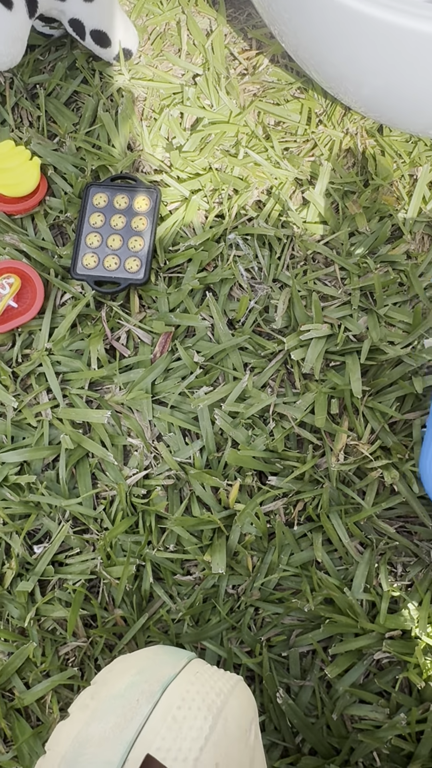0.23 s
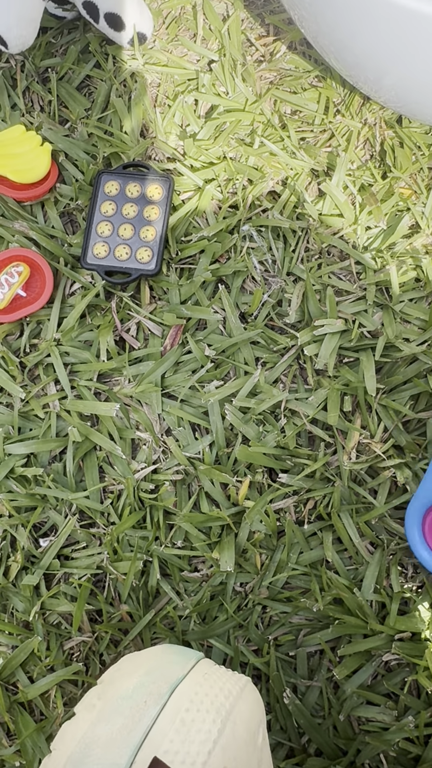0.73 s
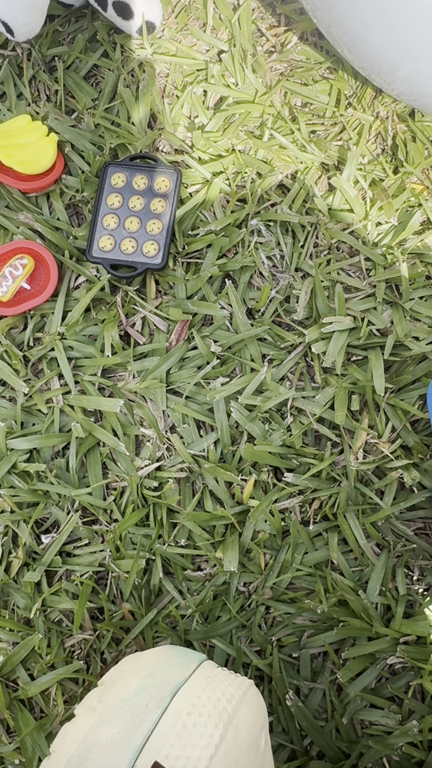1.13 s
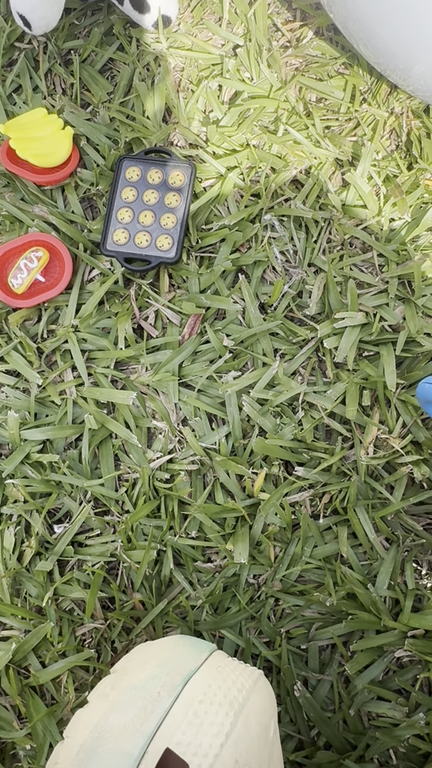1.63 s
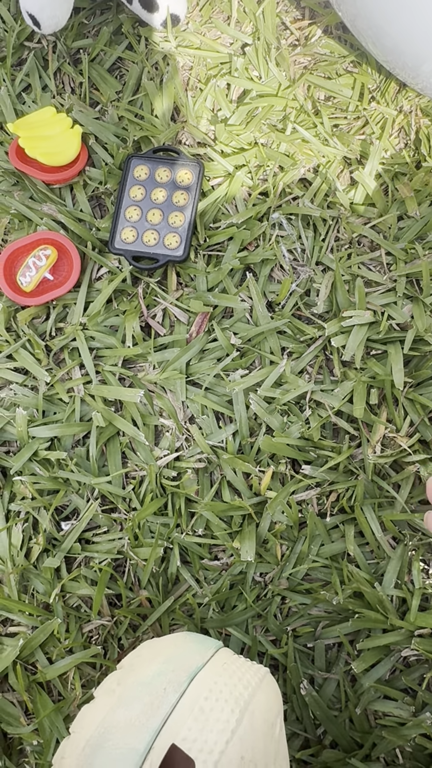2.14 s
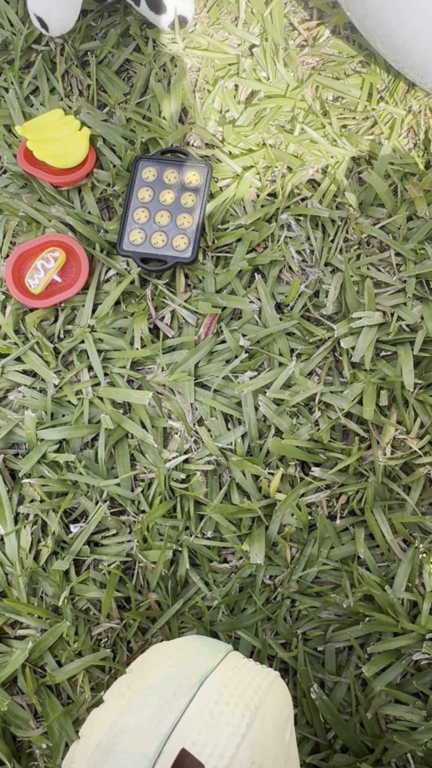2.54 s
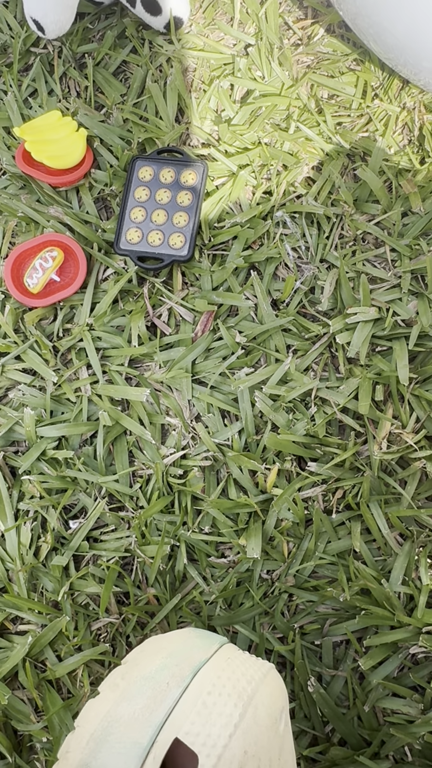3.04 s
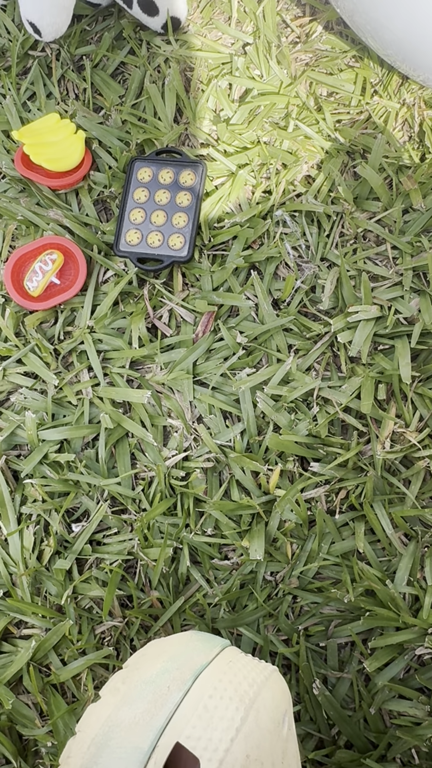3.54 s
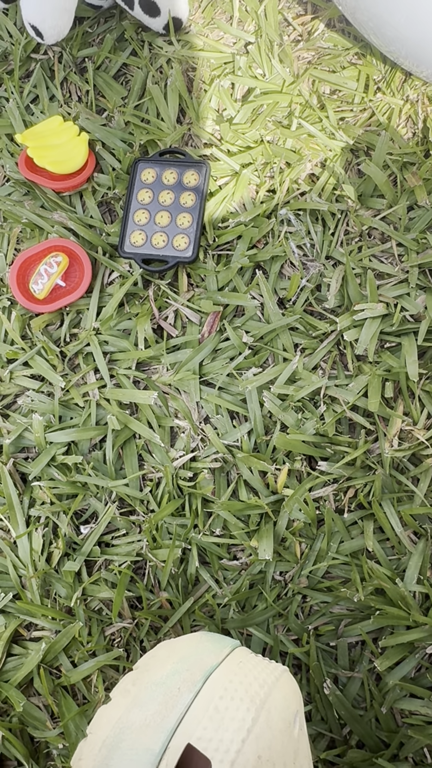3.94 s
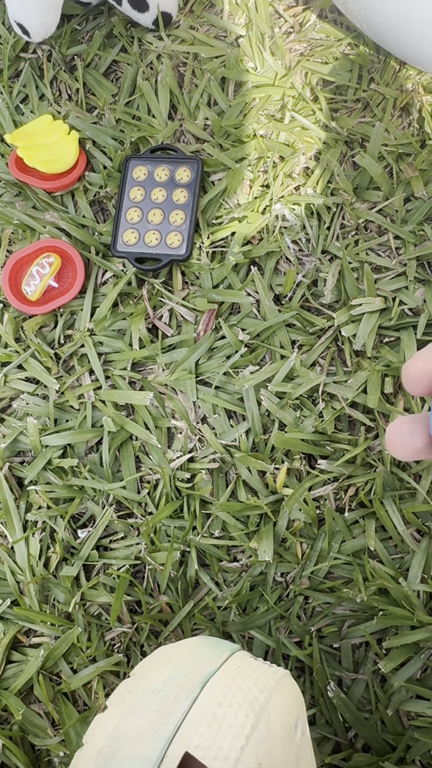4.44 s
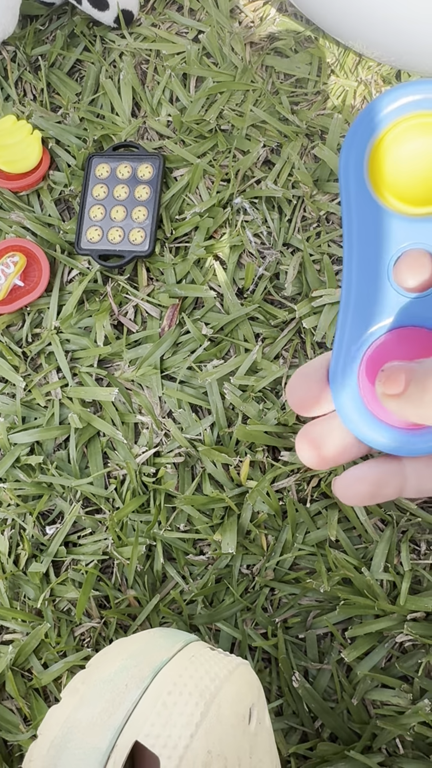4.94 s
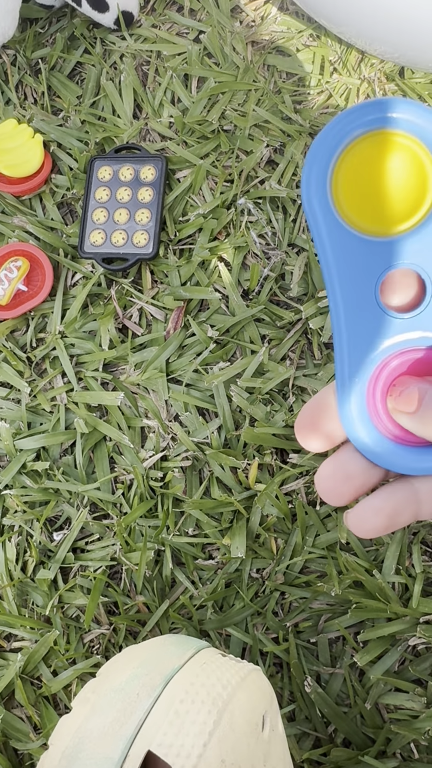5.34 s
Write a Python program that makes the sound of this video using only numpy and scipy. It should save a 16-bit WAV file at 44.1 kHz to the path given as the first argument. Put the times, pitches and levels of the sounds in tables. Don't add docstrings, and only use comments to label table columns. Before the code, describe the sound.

Quiet outdoor setting with steady low hum, airy hiss and faint cars. A far bird chirps a rising note and falling answer about twice a second. Close up, fingers tick and brush plastic, then two domes are popped in and later popped back out, dry and very brief, the outward ones brighter and clickier. Close stereo microphone, hardly any echo on the toy.

```python
import sys
import numpy as np
from scipy import signal
from scipy.fft import rfft, irfft, next_fast_len
from scipy.io import wavfile
from scipy.ndimage import uniform_filter1d

SR = 44100
rng = np.random.default_rng(int(sys.argv[2]) if len(sys.argv) > 2 else 0)


def invert_db(x):
    u = np.asarray(x, float) / 20
    return 10 ** u


def transcribe(signal):
    frames = np.atleast_2d(signal).T
    limited = np.clip(frames, -1, 1)
    pcm = np.round(limited * 32767).astype(np.int16)
    wavfile.write(sys.argv[1], SR, pcm)


N = 246445
T = np.arange(N) / SR
SIZE = next_fast_len(N)
BINS_HZ = np.arange(SIZE // 2 + 1) * SR / SIZE + 1e-9
OCTAVES = np.log2(BINS_HZ)


def walk(rate_hz):
    knots = np.repeat(rng.standard_normal(int(N / SR * rate_hz) + 2), 8)
    smooth = uniform_filter1d(uniform_filter1d(knots, 8), 8)
    return 1.3 * np.interp(T * rate_hz * 8, np.arange(len(knots)), smooth)


def over_hz(table, column=1):
    rows = np.array(table, float)
    return np.interp(OCTAVES, np.log2(rows[:, 0]), rows[:, column])


def hiss(colour, flicker_db, rate_hz, source=None):
    low_hz, high_hz = colour[0][0], colour[-1][0]
    if source is None:
        source = rng.standard_normal(N)
    spectrum = rfft(source, SIZE) * invert_db(over_hz(colour))
    spectrum[(BINS_HZ < low_hz) | (BINS_HZ > high_hz)] = 0
    out = np.zeros(N)
    for octave in range(int(np.log2(low_hz)), int(np.log2(high_hz)) + 2):
        share = np.clip(1 - np.abs(OCTAVES - octave), 0, 1)
        flicker = invert_db(flicker_db * walk(rate_hz))
        out += irfft(spectrum * share, SIZE)[:N] * flicker
    return out / np.sqrt(np.mean(out ** 2))


def ports(x):
    # frequency in Hz, left minus right in dB, left lead in radians.
    port_split = [(300, 0, -.4), (550, -1, -.4), (750, -6, 0), (1100, -4, .4), (2400, 0, .2), (3300, 2, .6),
                  (4300, 4, .1), (5500, 0, -.5), (7000, 0, -1.25), (10000, 0, -2.55), (14500, 0, -4.1),
                  (17000, 0, -5)]
    half = invert_db(over_hz(port_split) / 2) * np.exp(.5j * over_hz(port_split, column=2))
    bass_cut = np.clip((BINS_HZ - 200) / 150, 0, 1)
    top_cut = np.clip((17000 - BINS_HZ) / 900, 0, 1)
    spectrum = rfft(x, SIZE) * bass_cut * top_cut
    return np.array([irfft(spectrum * half, SIZE)[:N], irfft(spectrum / half, SIZE)[:N]])


def cooler():
    # frequency in Hz, level in dB rms, start phase in turns.
    hum = [
        (58.9, -48.5, .1),
        (117.9, -54.5, .0),
        (119.95, -55.5, .22),
        (176.6, -61.5, .3),
        (240.1, -56.5, .4),
    ]
    # frequency in Hz, density in dB per Hz.
    rumble_colour = [(20, -47.5), (35, -21), (50, -6.5), (62, -1.5), (80, -6.5), (100, -1), (150, -8.5),
                     (210, -13.5), (300, -18), (400, -28), (600, -49)]
    # time in seconds, rumble level in dB.
    load = [(0, -55.5), (.4, -53), (.8, -55.5), (2.0, -55), (3.55, -56), (3.87, -52.5), (4.28, -52.5),
            (4.7, -55), (5.59, -53.5)]
    # time in seconds, frequency in Hz, length in seconds, level in dB.
    engine = (.87, 99, .16, -44)
    lines = np.zeros(N)
    for hz, db, turns in hum:
        lines += invert_db(db + 0.98 * walk(5)) * np.sqrt(2) * np.sin(2 * np.pi * (hz * T + turns))
    at_s, hz, length_s, db = engine
    thump = invert_db(db) * np.exp(-(2 * (T - at_s) / length_s) ** 2) * np.sin(2 * np.pi * hz * T)
    rumble_db = np.interp(T, *np.transpose(load)) + 5.5
    return lines + thump + hiss(rumble_colour, 0.99, 3.7) * invert_db(rumble_db)


def outdoors():
    # frequency in Hz, density in dB per Hz.
    mid_colour = [(300, -16.5), (400, -1), (600, -6.5), (850, -15.5), (1450, -11), (2100, -16.5),
                  (2800, -13.5), (3800, -14), (4700, -18.5), (6500, -45)]
    side_colour = [(30, -8.5), (65, -3), (150, -5.5), (240, 0.5), (520, -5.5), (740, -2), (940, -11.5),
                   (1280, -11), (1800, -22.5), (2450, -13), (3200, -15), (5000, -19.5), (6500, -44)]
    air_colour = [(3500, -25.5), (5000, -9.5), (6300, 0.5), (7000, -5), (8500, -6), (11500, -2),
                  (14500, -18), (16000, -21), (16500, -50.5)]
    # time in seconds, half length in seconds, swell in dB.
    cars = [
        (0.754, 0.34, 3.5),
        (1.978, 0.47, 0.5),
        (2.602, 0.59, 2.5),
        (3.81, 0.466, 3.5),
        (5.398, 0.58, 2.5),
    ]
    # frequency in Hz, width in Hz, level in dB.
    tyres = (2150, 500, -78)
    near = [np.exp(-((T - s) / half_s) ** 2) for s, half_s, _ in cars]
    traffic_db = -76 + sum(share * swell_db for share, (_, _, swell_db) in zip(near, cars))
    mid = hiss(mid_colour, 1.07, 6) * invert_db(traffic_db + 5.5)
    side = hiss(side_colour, 1.2, 6) * invert_db(traffic_db + 7.0)
    air = ports(hiss(air_colour, 1.6, 8) * invert_db(-69.5))
    hz, width_hz, whine_db = tyres
    whine_colour = [(hz - width_hz, -15), (hz, 0), (hz + width_hz, -15)]
    whine = hiss(whine_colour, 1.5, 8) * invert_db(whine_db) * near[0]
    return np.array([mid + side, mid - side]) + air + whine


def bird():
    # start in seconds, note level in dB, answer level in dB, answer start in Hz.
    phrases = [(.18, -65.5, -72, 3500), (.738, -66, -66.5, 3520), (1.247, -64, -67, 3520),
               (1.787, -66.5, -70, 3500), (2.262, -64.5, -70.5, 3570), (2.76, -65, -69.5, 3500),
               (3.26, -65, -67, 3505), (3.69, -64.5, -66, 3850), (3.977, -65.5, -69.5, 3850),
               (4.22, -65.5, -69.5, 3900), (4.45, -66.5, -68, 3860), (4.647, -66.5, -69.5, 3850),
               (4.9, -66, -70, 3850), (5.33, -68, -72, 3850), (5.54, -67, -80, 3860)]
    # start in seconds, start in Hz, end in Hz, level in dB.
    lone_notes = [
        (.13, 3800, 3700, -70.5),
        (3.518, 3920, 4050, -70),
        (5.088, 3620, 3450, -65.5),
    ]
    note_s, rise_from_hz, rise_to_hz = .05, 3700, 3965
    answer_after_s, answer_fall_hz = .105, 231
    buzz_hz, buzz_rad, rasp_rad = 300, 1.3, 0.69
    tail_t60_s, direct_db = 0.43, 27

    notes = [(s, rise_from_hz, rise_to_hz, db) for s, db, _, _ in phrases] + list(lone_notes)
    notes += [(s + answer_after_s, hz, hz - answer_fall_hz, db) for s, _, db, hz in phrases]
    song = np.zeros(N + SR)
    rough = rasp_rad * walk(400)
    t = np.arange(int(note_s * SR)) / SR
    buzz = buzz_rad * np.sin(2 * np.pi * buzz_hz * t)
    swell = np.sin(np.pi * np.sqrt(t / note_s))
    for s, start_hz, end_hz, db in notes:
        turns = start_hz * t + (end_hz - start_hz) * t ** 2 / (2 * note_s)
        rasp = rough[int(s * SR / 2):][:len(t)]
        song[int(s * SR):][:len(t)] += invert_db(db) * np.sin(2 * np.pi * turns + buzz + rasp) * swell

    t = np.arange(SR // 2) / SR
    echoes = rng.standard_normal((2, len(t))) * invert_db(-60 * t / tail_t60_s)
    echoes[:, 0] = invert_db(direct_db)
    echoes /= np.sqrt(np.sum(echoes ** 2, axis=1, keepdims=True))
    return invert_db(6.0) * signal.fftconvolve(song[None], echoes, axes=1)[:, :N]


def rustle():
    # frequency in Hz, density in dB per Hz.
    rustle_colour = [(2000, -15.5), (5000, -7), (8000, -5), (11500, 0), (15000, 0.5), (15900, -8),
                     (16500, -41)]
    # start in seconds, hold in seconds, level in dB.
    strokes = [(.316, .005, -76.5), (.532, .005, -79.5), (.79, .19, -77), (1.176, .25, -78),
               (1.426, .003, -73), (1.565, .04, -84), (1.616, .005, -79), (1.864, .005, -70),
               (2.244, .005, -75), (2.65, .005, -90), (2.756, .005, -77.5), (3.106, .002, -78),
               (3.19, .11, -84.5), (3.338, .005, -79), (3.486, .005, -85), (3.618, .003, -91),
               (3.712, .005, -82), (3.788, .01, -72.5), (3.9, .05, -81), (3.992, .005, -78.5),
               (4.156, .01, -80), (4.408, .005, -82.5), (5.19, .01, -88.5)]
    grip_db_s, slip_off_db_s, resting_db = 599, 258, -103
    grain_db = 2.5 * np.repeat(rng.exponential(size=N // 40 + 1), 40)[:N]
    grains = rng.standard_normal(N) * invert_db(grain_db)
    pressure_db = np.full(N, float(resting_db))
    for s, held_s, db in strokes:
        grip_db = grip_db_s * np.maximum(s - T, 0)
        slip_db = slip_off_db_s * np.maximum(T - s - held_s, 0)
        pressure_db = np.maximum(pressure_db, db - grip_db - slip_db)
    return hiss(rustle_colour, 1.2, 16, grains) * invert_db(pressure_db + 11.0)


def add_mode(out, at_s, hz, creep_ms, t60_ms, db, way=1):
    start = int((at_s - .006) * SR)
    t = T[start:start + 1600] - at_s
    swell = np.exp(np.minimum(t, 0) / (creep_ms / 1000 + 1e-5))
    ring = invert_db(-60 * (np.maximum(t, 0) / (t60_ms / 1000 + 1e-5)) ** 1.4)
    out[start:start + len(t)] += way * invert_db(db) * swell * ring * np.cos(2 * np.pi * hz * t)


def ticks():
    # time in seconds, peak in dB, thud relative to tick in dB, thud pitch ratio.
    taps = [(0.5294, -61, -11, 0.92), (0.7887, -60, -11, 0.92), (0.9283, -65, -12, 1),
            (0.9612, -59, -10, 1), (1.0094, -60, -11, 1), (1.285, -60, -17, 1), (1.361, -58, -14, 1),
            (1.4252, -59, -19, 1), (1.6167, -63, 2, .9), (2.712, -67, 11, .8), (2.7566, -55, 6, 0.75),
            (3.105, -57, -15, 0.8), (3.3363, -57, -15, 1.1), (3.3757, -58.5, -11, 1),
            (3.618, -64.5, 12, 1.08), (3.7802, -58, -14, 1), (3.8262, -65.5, 8, 1.26),
            (3.9674, -57, -13, 0.78), (4.155, -67, -9, 1), (4.17, -57.5, -10, 1.15)]
    # frequency in Hz, T60 in ms, level in dB.
    tick_modes = [(5660, 3, -3.5), (7300, 3.8, -5), (10570, 2.6, 4), (14750, 1.8, -2.5)]
    thud_modes = [(960, 6, 0.5), (2600, 4.5, -9)]
    out = np.zeros(N)
    detune = 1 + 0.053 * rng.standard_normal((len(taps), 6))
    for (s, db, thud_db, pitch), shift in zip(taps, detune):
        for k, (hz, t60_ms, mode_db) in enumerate(tick_modes):
            add_mode(out, s + .0005, hz * shift[k], .2, t60_ms, db + mode_db + 5.0)
        for k, (hz, t60_ms, mode_db) in enumerate(thud_modes):
            thud_hz = hz * pitch * shift[-1 - k]
            add_mode(out, s + 0.00063, thud_hz, .4, t60_ms, db + thud_db + mode_db + 0.66)
    return out


def snaps():
    # time in seconds, dome lag in ms, shell creep in ms, dome creep in ms.
    pops = [
        (1.5384, 0.92, 0.26, 0.74),
        (2.61086, 1.08, 0.21, 0.56),
        (3.1515, 2.04, 0.22, 0.77),
        (5.1708, 1.48, 0.5, 0.64),
    ]
    pushed = [-1, -1, 1, 1]
    # frequency in Hz, T60 in ms, level in dB.
    small_in = [(393, 5.8, -34.5), (930, 6.3, -18.5), (1320, 3.7, -20.5), (1860, 7.2, -26),
                (2390, 15.0, -56), (3160, 16, -48), (4050, 6.1, -35.8), (5800, 2.6, -37.4), (8030, 2, -30),
                (11130, 3, -30.5), (14500, 3.2, -36.5)]
    large_in = [(308, 12.3, -44), (518.2, 4.8, -15), (922.5, 8.4, -9.5), (1238, 4.6, -14),
                (1920, 14.62, -45), (2450, 5.3, -24.5), (3010, 12.7, -46), (3920, 12.3, -38.5),
                (5664, 2.4, -20), (6910, 4.7, -29), (9360, 7.8, -42), (10740, 3.45, -29.5),
                (15040, 0.914, -34)]
    small_out = [(360, 5.6, -35.5), (767, 6, -27), (1380, 5.7, -34.5), (2160, 11, -35), (2530, 2.8, -12.5),
                 (3060, 7.5, -32), (3890, 2.1, -19), (5900, 1.3, -18), (6900, 4.3, -20), (9100, 2.1, -27),
                 (10670, 1.9, -9.5), (13450, 4.1, -22), (15140, 1.7, -5)]
    large_out = [(250, 0.9, -53), (502, 10.6, -24.5), (704, 3.2, -11.5), (980, 0.9, -22.5),
                 (1820, 6.3, -21.5), (2490, 7.5, -39), (3220, 3.1, -15), (4110, 3.4, -20.5),
                 (4800, 1.4, -23), (7300, 1.5, -25), (8800, 2.3, -24.5), (10950, 0.53, -19.5),
                 (15120, 3.9, -33)]
    dome_top_hz, rim_lag_ms, rim_hz = 1150, 0.15, 15000
    out = np.zeros(N)
    mode_sets = (small_in, large_in, small_out, large_out)
    for (s, lag_ms, shell_ms, dome_ms), modes, way in zip(pops, mode_sets, pushed):
        for hz, t60_ms, db in modes:
            if hz < dome_top_hz:
                late_ms, creep_ms = lag_ms, dome_ms
            else:
                late_ms, creep_ms = rim_lag_ms * (hz / rim_hz) ** 2, shell_ms
            add_mode(out, s + late_ms / 1000, hz, creep_ms, t60_ms, db, way)
    return out


def scatter(x):
    scatter_db, t60_s, from_hz = -15.5, .016, 800
    t = np.arange(800) / SR
    highpass = signal.butter(2, from_hz, "high", fs=SR, output="sos")
    tail = signal.sosfilt(highpass, rng.standard_normal(len(t))) * invert_db(-60 * t / t60_s)
    tail /= np.sqrt(np.sum(tail ** 2))
    return x + invert_db(scatter_db) * signal.fftconvolve(x, tail)[:N]


def scene():
    around = cooler() + outdoors() + bird()
    toy = rustle() + ticks() + snaps()
    return around + ports(scatter(toy))


def thin_middle(stereo):
    # frequency in Hz, weakest line kept in dB.
    weakest_line = [(7000, -130), (8500, -102), (10500, -101), (11500, -95.5), (12900, -95.5),
                    (13600, -104), (14500, -112), (15800, -113), (16500, -94.5)]
    mid, side = (stereo[0] + stereo[1]) / 2, (stereo[0] - stereo[1]) / 2
    hz, _, lines = signal.stft(mid, SR, nperseg=1024)
    weakest = invert_db(np.interp(hz, *np.transpose(weakest_line), left=-200))
    kept = lines * (np.abs(lines) > weakest[:, None])
    mid = signal.istft(kept, SR, nperseg=1024)[1][:N]
    return np.array([mid + side, mid - side])


def roll_off(x):
    return signal.sosfilt(signal.butter(12, 17300, fs=SR, output="sos"), x)


def record(dry):
    mix = thin_middle(dry)
    return roll_off(mix)


dry = scene()
out = record(dry)
transcribe(out)
```